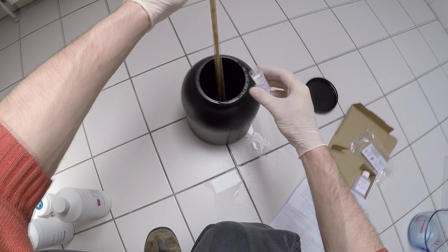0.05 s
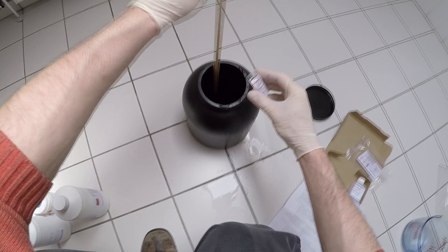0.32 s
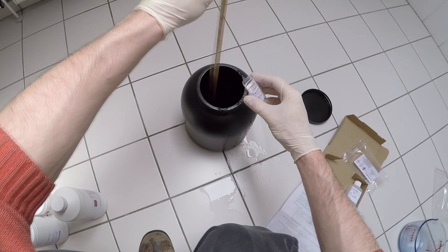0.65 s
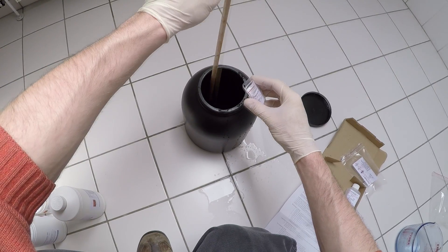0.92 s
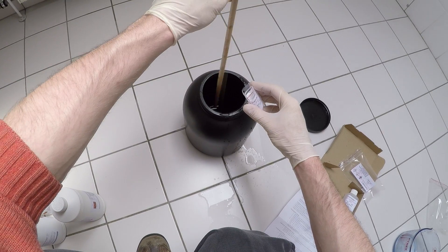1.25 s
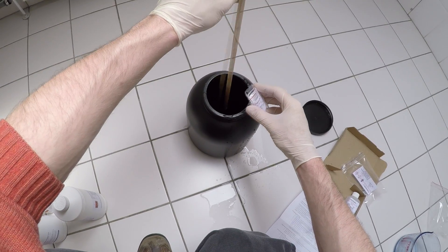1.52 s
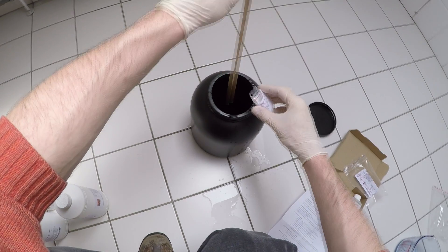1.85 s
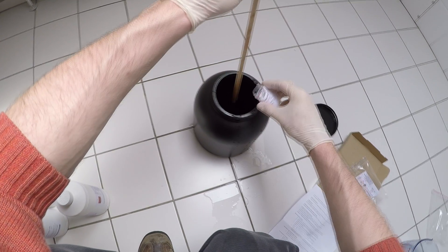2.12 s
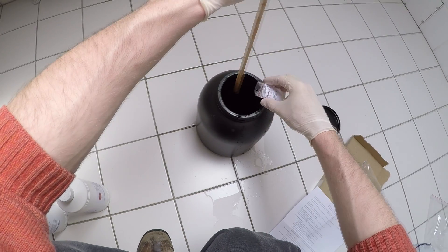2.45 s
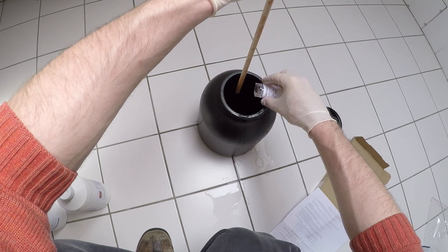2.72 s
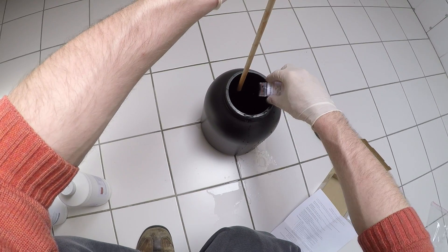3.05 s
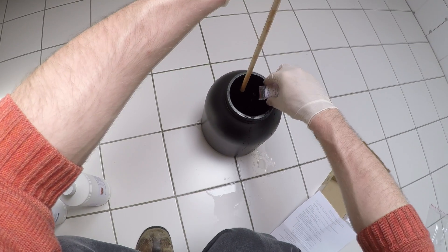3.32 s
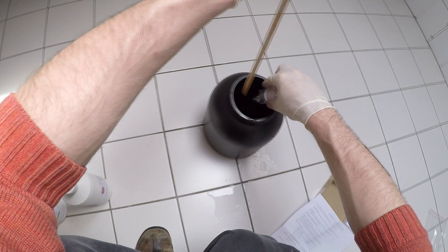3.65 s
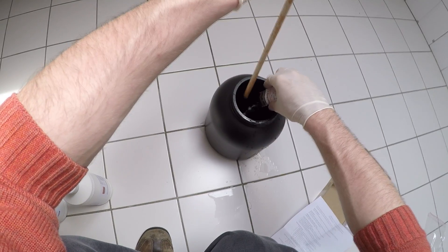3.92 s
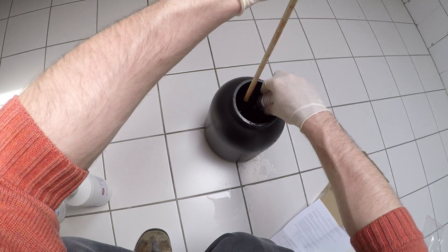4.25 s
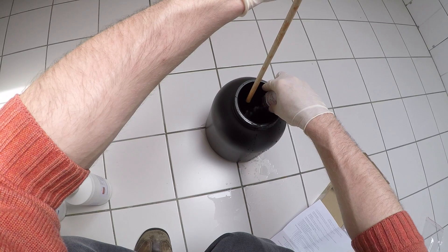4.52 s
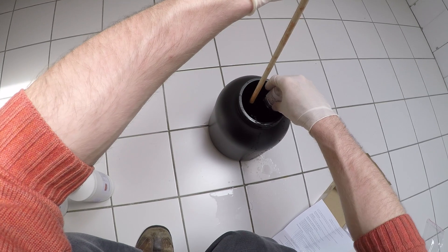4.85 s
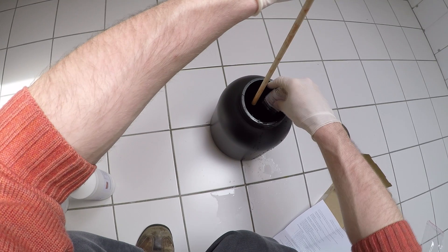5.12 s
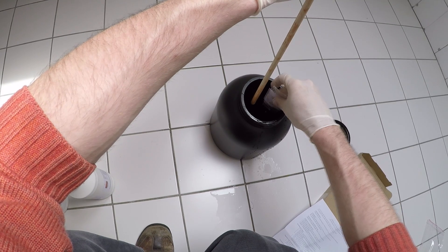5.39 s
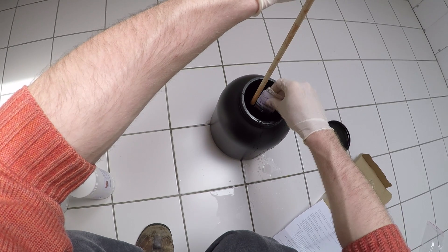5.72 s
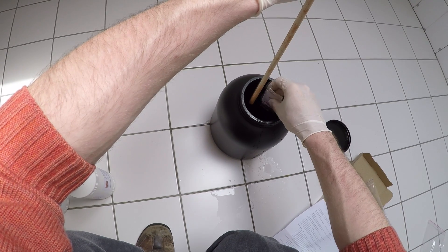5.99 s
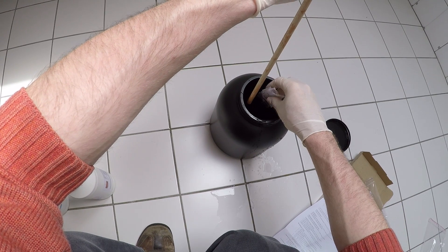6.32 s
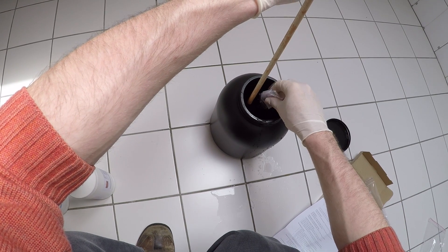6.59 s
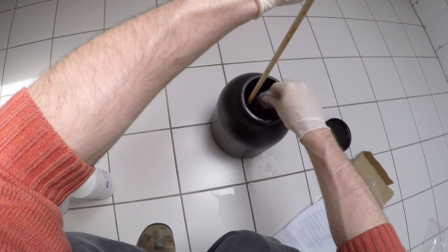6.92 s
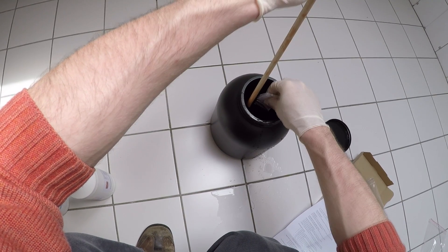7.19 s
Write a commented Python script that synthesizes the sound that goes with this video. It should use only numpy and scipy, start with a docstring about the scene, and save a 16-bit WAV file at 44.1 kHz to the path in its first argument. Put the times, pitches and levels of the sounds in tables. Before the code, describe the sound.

In a bare, echoing tiled room, a run of sharp nearby taps from a plastic cup on a large jar speeds up and turns softer and hollower. Stirring follows: a wooden stick scrapes the inner wall and bumps it in an uneven cluster, with a low hum and a few liquid gulps. A rubber glove crackles and the cup clicks last. Faint hiss, rumble and a dull low pulse lie underneath.

```python
"""A small plastic cup raps 13 times on the rim of a big jar of liquid, on the floor of a tiled room.
Then a wooden stick scrapes and knocks inside; the air in the jar hums and the liquid gulps.
At the end a rubber glove rustles on the cup, which ticks lightly. The bare room rings after
knocks and scrapes. Under it all: faint hiss, rumble and a dull low pulse."""
import sys
import numpy as np
from scipy import signal
from scipy.fft import rfft, irfft, next_fast_len
from scipy.io import wavfile
from scipy.ndimage import map_coordinates

SR = 44100
rng = np.random.default_rng(int(sys.argv[2]) if len(sys.argv) > 2 else 0)


def persist_wave(psi):
    """Save psi, clipped to +-1, as 16-bit WAV."""
    counts = np.round(np.clip(psi, -1, 1) * 32767).astype(np.int16)
    wavfile.write(sys.argv[1], SR, np.atleast_2d(counts).T)


N = 320166
AIR_HZ = 221.3  # jar neck and the air behind it
# stick strokes along the wall: middle_s, length_s, friction_db, hum_db
STROKES = [(0.34, 0.064, -60.5, -64), (3.515, 0.3, -52, -44.5), (3.904, 0.27, -66.5, -61.5),
           (4.734, 0.36, -58, -63), (5.094, 0.14, -46, -42), (5.587, 0.22, -44, -43),
           (6.144, 0.29, -60.5, -43), (6.396, 0.53, -60, -60)]


def amp(db):
    """dB to gain."""
    return 10 ** (np.asarray(db) / 20)


def unit(x):
    """Scale to rms 1."""
    return x / np.sqrt(np.mean(x ** 2) + 1e-20)


def along(points, hz):
    """Interpolate (freq_hz, value) points on a log axis."""
    freq_hz, values = np.transpose(points)
    return np.interp(np.log(hz + 1), np.log(freq_hz + 1), values)


def peak(hz, centre_hz, half_width_hz):
    """Resonance bell, height 1."""
    return 1 / (1 + ((hz - centre_hz) / half_width_hz) ** 2)


def wobble(rate_hz):
    """Smooth random curve through knots at rate_hz."""
    knots = rng.standard_normal(int(N * rate_hz / SR) + 4)
    return map_coordinates(knots, [np.arange(N) * rate_hz / SR])


def filtered(x, response):
    """Apply a complex frequency response."""
    size = next_fast_len(len(x) + SR // 2)
    return irfft(rfft(x, size) * response(np.fft.rfftfreq(size, 1 / SR)), size)[:len(x)]


def low_cut(x, corner_hz):
    """Two-pole high-pass."""
    return filtered(x, lambda hz: (1j * hz / (corner_hz + 1j * hz)) ** 2)


def min_phase(level_db, size=8192):
    """Tightest impulse response with the spectrum level_db(hz)."""
    cepstrum = irfft(np.log(amp(level_db(np.fft.rfftfreq(size, 1 / SR))) + 1e-6))
    cepstrum[1:size // 2] *= 2
    cepstrum[size // 2 + 1:] = 0
    return irfft(np.exp(rfft(cepstrum)))


def add(track, start_s, sound):
    """Mix into track in place."""
    part = track[max(round(start_s * SR), 0):][:len(sound)]
    part += sound[:len(part)]


def grains(rate_hz, spread_db):
    """Random tiny slips of uneven size."""
    slips = (rng.random(N) < rate_hz / SR) * rng.standard_normal(N)
    return unit(slips * amp(spread_db * rng.standard_normal(N)))


def swells(moves, edge_db=10):
    """Gain of hand moves (middle_s, length_s, level_db): each speeds up, then slows."""
    t = np.arange(N) / SR
    return sum(amp(db - edge_db * np.abs(2 * (t - middle_s) / length_s) ** 1.5)
               for middle_s, length_s, db in moves)


def ringing(modes):
    """Impulse response of damped modes (pitch_hz, resonance_gain_db, t60_s)."""
    t = np.arange(SR) / SR
    damped = [(hz, db, np.log(1000) / t60_s) for hz, db, t60_s in modes]
    return sum(amp(db) * 2 * decay / SR * np.exp(-decay * t) * np.cos(2 * np.pi * hz * t)
               for hz, db, decay in damped)


def rising_note(start_hz, t60_s, rise, attack_s):
    """Damped sine; pitch climbs by the fraction rise."""
    t = np.arange(SR // 2) / SR
    pitch_hz = start_hz * (1 + rise * (1 - np.exp(-t / 0.023)))
    envelope = amp(-60 * t / t60_s) * (1 - np.exp(-t / attack_s))
    return np.sin(2 * np.pi * np.cumsum(pitch_hz) / SR) * envelope


def background():
    """Faint hiss over an uneven rumble."""
    # empty-room spectrum: freq_hz, density_db
    quiet = [(20, -6), (60, -9.5), (110, -23.5), (260, -19), (600, -29), (1500, -36.5), (3400, -39.5),
             (5000, -41), (15500, -50.5)]
    hiss = unit(filtered(rng.standard_normal(N), lambda hz: amp(along(quiet, hz))))
    rumble = unit(filtered(rng.standard_normal(N), lambda hz: peak(hz, 30, 15)))
    return amp(-54) * hiss + amp(-66 + 4 * wobble(8.8)) * rumble


def low_pulse(first_s=0.0514, period_s=0.1024, level_db=-6.5, spread_db=3):
    """Faint, dull, dry beat, about ten a second."""
    out = np.zeros(N)
    spectrum = [(20, -12), (55, 9), (130, -1), (260, -17.5), (600, -41.5), (2000, -71.5)]
    beat = min_phase(lambda hz: along(spectrum, hz))
    for start_s in np.arange(first_s, N / SR, period_s):
        add(out, start_s, amp(level_db + spread_db * rng.standard_normal()) * beat)
    return out


def room_tail():
    """Diffuse echoes off the tiles; decay time varies with frequency."""
    # reverberation bands: freq_hz, t60_s, level_db
    bands = np.array([(60, 0.63, -6), (158, 0.57, 1), (295.7, 0.65, 11), (565, 0.72, 9), (1200, 0.54, 1.5),
                      (1950, 0.5, 3.5), (3185, 0.53, -4), (3760, 0.47, 2), (5940, 0.46, 0),
                      (13000, 0.26, 2)])
    hz, t, noise = signal.stft(rng.standard_normal(SR), SR, nperseg=256)
    t60_s = along(bands[:, :2], hz)[:, None]
    level_db = along(bands[:, ::2], hz)[:, None]
    energy_norm = np.sqrt(2 * np.log(1000) / (t60_s * SR))
    gain = amp(level_db - 60 * t / t60_s) * energy_norm
    tail = signal.istft(noise * gain, SR, nperseg=256)[1][:SR]
    onset = np.clip((np.arange(SR) / SR - 0.002) / 0.001, 0, 1)
    return tail * onset


def varied_tail(tail, mix_rad=0.73):
    """Moving arms change part of the echo pattern between blows."""
    return np.cos(mix_rad) * tail + np.sin(mix_rad) * room_tail()


def scatter(t60_s, low_cut_hz):
    """Close reflections, energy 1; small surfaces return little bass."""
    t = np.arange(SR // 10) / SR
    burst = rng.standard_normal(len(t)) * amp(-60 * t / t60_s) * np.minimum(t / 0.00025, 1)
    burst = low_cut(burst, low_cut_hz)
    return burst / np.linalg.norm(burst)


def in_room(x, tail, direct_db=0):
    """Direct sound, diffuse tail and low standing waves."""
    # modes between the walls: pitch_hz, gain_db, t60_s
    standing_waves = [(81.76, 11, 1.3), (164.1, 14.5, 0.47), (205.7, 12, .5), (230.8, 18, 0.74),
                      (306.4, 15.5, 0.87), (368, 21.5, 1.1), (390, 12, 1.2)]
    response = tail + ringing(standing_waves)
    add(response, 0, np.array([amp(direct_db)]))
    return signal.fftconvolve(x, response)


def glove():
    """Rubber slips on the cup: dense crackle, coloured by the cup wall."""
    # rubber friction spectrum: freq_hz, density_db
    rubber = [(200, -28), (500, -14), (1100, 2), (1500, -4), (2900, 1.5), (4500, -2), (6000, -2),
              (8000, -7), (12000, -14), (15500, -19)]
    # glove moves: middle_s, length_s, level_db
    rubs = [(0.36, 0.05, -69), (5.12, 0.14, -66), (5.59, 0.21, -55), (6.46, 0.18, -61.5),
            (6.675, 0.081, -56.5), (6.81, 0.18, -53), (6.95, 0.19, -46.5), (7.215, 0.24, -58.5)]
    cup_db = lambda hz: 5 * peak(hz, 2800, 160) + 3 * peak(hz, 5300, 264)
    slips = grains(rate_hz=9000, spread_db=1)
    crackle = unit(filtered(slips, lambda hz: amp(along(rubber, hz) + cup_db(hz))))
    grip = amp(2.2 * wobble(35))
    return crackle * grip * swells(rubs)


def cup_ticks():
    """Small sharp snaps ring the cup."""
    # snaps of the cup: start_s, snap_db, ring_db
    ticks = [(6.6878, 0.5, -41), (6.695, -17, -69), (6.9801, 2, -61), (7.038, 0, -27)]
    # cup modes: pitch_hz, level_db, t60_s
    cup_modes = [(918, -14.5, 0.081), (1120, -34, 0.23), (1784, -21, 0.09), (3000, -10, 0.094),
                 (3068, -13, 0.18), (3600, -18, .08), (4370, -17, 0.068), (5680, -24, .08)]
    out = np.zeros(N)
    t = np.arange(SR // 3) / SR
    spectrum = [(200, -6.5), (1200, -15.5), (3500, -10), (7000, -16.5), (15000, -35.5)]
    snap = min_phase(lambda hz: along(spectrum, hz))
    ring = sum(amp(db - 60 * t / t60_s) * np.sin(2 * np.pi * hz * t) for hz, db, t60_s in cup_modes)
    for start_s, snap_db, ring_db in ticks:
        add(out, start_s, amp(snap_db) * signal.fftconvolve(snap, scatter(t60_s=0.002, low_cut_hz=410)))
        add(out, start_s, amp(ring_db) * ring)
    return out


def gulps():
    """Big air pockets close in the liquid, each with a rising note."""
    # pockets behind the stick: start_s, level_db, pitch_hz
    pockets = [(5.137, -29, 188), (5.825, -29.5, 164), (6.208, -47, 183)]
    out = np.zeros(N)
    for start_s, level_db, pitch_hz in pockets:
        add(out, start_s, amp(level_db) * rising_note(pitch_hz, t60_s=0.24, rise=0.16, attack_s=0.0034))
    return out


def air_hum():
    """Air in the jar hums on one wavering note as each stroke swirls the liquid."""
    pitch_hz = AIR_HZ * (1 + 0.0466 * wobble(45))
    tone = unit(np.sin(2 * np.pi * np.cumsum(pitch_hz) / SR))
    slosh = amp(4 * wobble(40))
    envelope = swells([(middle_s, length_s, db) for middle_s, length_s, _, db in STROKES])
    return envelope * slosh * tone


def jar_db(hz):
    """Radiation of the jar: broad response plus resonances."""
    # broad wall response: freq_hz, gain_db
    wall = [(25, -14), (60, 16.5), (110, 16.5), (200, 19), (290, 16), (700, 14), (900, 14.5), (1200, 11.5),
            (2500, 12), (3700, 16.5), (5000, 7), (7500, -1), (10000, -5.5), (15500, -15.5)]
    # jar peaks and dips: centre_hz, half_width_hz, gain_db
    resonances = [(350, 29, -3), (450, 29, -5), (578, 60, 0), (880, 25, -6.5), (1153, 39, 8),
                  (1315.5, 56, 12), (1455, 35, 0.5), (1575, 51, 9.5), (1797, 25, 5), (1992, 35, 5),
                  (2208, 57, 7), (2335, 43, 6.5), (2320, 49, -4), (2640, 60, 3), (2978, 119, 11.5),
                  (3435, 73.5, 7.5), (3956, 87, 4.5), (4440, 98, 1), (4740, 90, 2), (5450, 130, 2.5),
                  (6660, 130, 5), (7800, 200, 2.5)]
    peaks_db = sum(db * peak(hz, centre_hz, half_width_hz) for centre_hz, half_width_hz, db in resonances)
    return along(wall, hz) + peaks_db


def stick_scrape():
    """Wood slips along the wall in tiny steps that ring jar and stick."""
    stick_db = lambda hz: (4 * peak(hz, 3500, 90) + 6 * peak(hz, 910, 350)
                           + 4 * peak(hz, 4600, 400) - 4 * peak(hz, 2945, 150))
    slips = grains(rate_hz=2500, spread_db=5)
    scrape = unit(filtered(slips, lambda hz: amp(jar_db(hz) + stick_db(hz)) / np.hypot(1, hz / 2000)))
    scrape = low_cut(scrape, 170)  # slips too small to shake the lowest notes
    return scrape * swells([(middle_s, length_s, db) for middle_s, length_s, db, _ in STROKES])


def jar_blow(contact_hz, thump_db, colour_db, lag_s=0.0028, bend_hz=4000):
    """One blow: soft contact dulls it, the floor thumps, the struck spot colours it."""
    # faint lasting ring of the jar: pitch_hz, gain_db, t60_s
    jar_modes = [(666, -1.5, 0.8), (727, 4.5, 0.6), (1128, -0.5, 0.75), (1285, 1, 0.91), (1322, -4.5, 0.81),
                 (1557, -3, 0.5), (1809, -6, 0.8), (2120, -4.5, .5), (3430, -3.5, 0.38)]
    contact_db = lambda hz: -20 * np.log10(1 + (hz / contact_hz) ** 2)
    floor_db = lambda hz: thump_db / (1 + (hz / 178) ** 8)
    knock = min_phase(lambda hz: jar_db(hz) + contact_db(hz) + floor_db(hz) + colour_db(hz))
    # bending waves carry treble fastest: short falling chirp
    knock = filtered(knock, lambda hz: np.exp(-2j * np.pi * lag_s * bend_hz * np.arctan(hz / bend_hz)))
    # moving liquid detunes the wall
    detuned = [(hz * (1 + 0.006 * rng.standard_normal()), db + 2 * rng.standard_normal(), t60_s)
               for hz, db, t60_s in jar_modes]
    sound = signal.fftconvolve(knock, ringing(detuned))
    add(sound, 0, knock)
    return sound


def jar_bumps(tail):
    """A faint opening ring, then dull stick knocks that bounce around the hollow and out the neck."""
    # first row: faint dull ring already dying away as the sound opens; the rest: stick on the inner wall
    # start_s, level_db, contact_hz, relative_hum_db, spot_hz, spot_db
    bumps = [(0.002, -19.5, 860, -8.5, 860, 11), (3.335, -12, 2540, -2, 1270, 5),
             (5.138, -10.5, 910, -2.5, 460, 0), (5.219, -13.5, 1170, 5, 1230, 6),
             (5.424, -10, 3280, 1, 1330, 3.5), (5.828, -3.5, 440, 0, 580, 8),
             (5.909, -11, 1710, 6.5, 2120, 9.5), (5.929, -3.5, 735, -5, 754, 13),
             (5.968, -19.5, 760, -4, 760, 3), (6.029, -11.5, 1220, 0, 570, -2),
             (6.099, -10.5, 800, -7.5, 1060, 9), (6.128, -17, 1690, 4, 570, 2.5)]
    out = np.zeros(N)
    for start_s, level_db, contact_hz, relative_hum_db, spot_hz, spot_db in bumps:
        hollow_db = lambda hz: (relative_hum_db + 9) * peak(hz, AIR_HZ, 26) + spot_db * peak(hz, spot_hz, 94)
        echoes = varied_tail(tail)
        add(echoes, 0, amp(-6) * scatter(t60_s=0.049, low_cut_hz=293.5))
        sound = jar_blow(contact_hz, thump_db=-0.5, colour_db=hollow_db)
        add(out, start_s, amp(level_db) * in_room(sound, echoes, direct_db=-6))
    return out


def cup_raps(tail, db_per_octave=7.5):
    """Cup hits the rim six times hard, then faster and softer; harder raps are brighter."""
    # raps on the rim: start_s, level_db, spot
    raps = [(0.428, -0.5, "dull"), (0.7426, 0, "pinging"), (1.0378, 0, "pinging"), (1.3246, 2, "pinging"),
            (1.5911, 1, "clacking"), (1.843, 2, "clacking"), (2.0494, -2.5, "hollow"),
            (2.2563, -2.5, "hollow"), (2.4552, -3, "hollow"), (2.6545, -6, "hollow"),
            (2.8483, -1, "hollow"), (3.058, -3, "hollow"), (3.26, -4, "hollow")]
    # rim spots by name: contact_hz (at 0 dB), thump_db, spot_hz, spot_db
    spots = {"dull": (5550, 6.5, 2950, 4.4), "pinging": (10100, 5.4, 3080, 4.1),
             "clacking": (6400, 0.5, 1231, 2.5), "hollow": (5101, -5, 602, 2.5)}
    # low modes of the jar belly: pitch_hz, level_db, t60_s
    belly = [(189.9, -22.5, 0.18), (552, -13, 0.052)]
    out = np.zeros(N)
    nearby = amp(3.5) * scatter(t60_s=0.023, low_cut_hz=1109)  # off floor and legs
    boom = sum(amp(db) * rising_note(hz, t60_s, rise=0.099, attack_s=0.0025) for hz, db, t60_s in belly)
    for start_s, level_db, spot in raps:
        contact_hz, thump_db, spot_hz, spot_db = spots[spot]
        contact_hz *= 2 ** (level_db / db_per_octave)
        knock = jar_blow(contact_hz, thump_db, lambda hz: spot_db * peak(hz, spot_hz, spot_hz / 15))
        echoes = varied_tail(tail)
        add(echoes, 0, nearby)
        add(out, start_s, amp(level_db) * in_room(knock, echoes, direct_db=-6.5))
        # heavy belly: answers late, depends less on rap strength
        add(out, start_s + 0.004, amp(level_db / 2) * boom)
    return out


def scene():
    """Mono mix; knocks and handling share one tiled room."""
    tail = room_tail()
    handling = in_room(stick_scrape() + glove() + cup_ticks(), tail)[:N]
    knocks = cup_raps(tail) + jar_bumps(tail)
    return (knocks + handling + air_hum() + gulps() + low_pulse() + background())[None]


def record(dry):
    """Soft clip, then brick-wall low-pass."""
    top_hz = 15600
    rounded = dry[0] / (1 + np.abs(dry[0]) ** 6) ** (1 / 6)
    return filtered(rounded, lambda hz: hz < top_hz)[None]


dry = scene()
out = record(dry)
persist_wave(out)
```